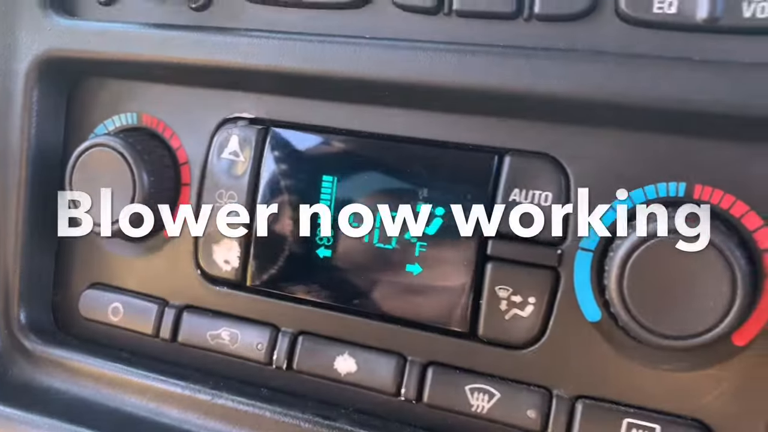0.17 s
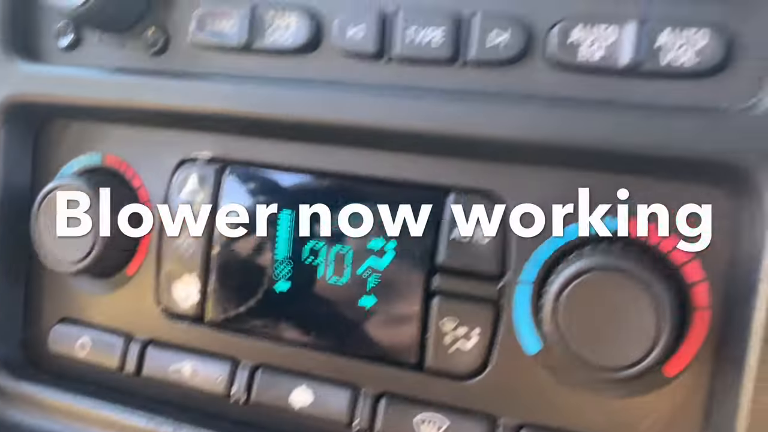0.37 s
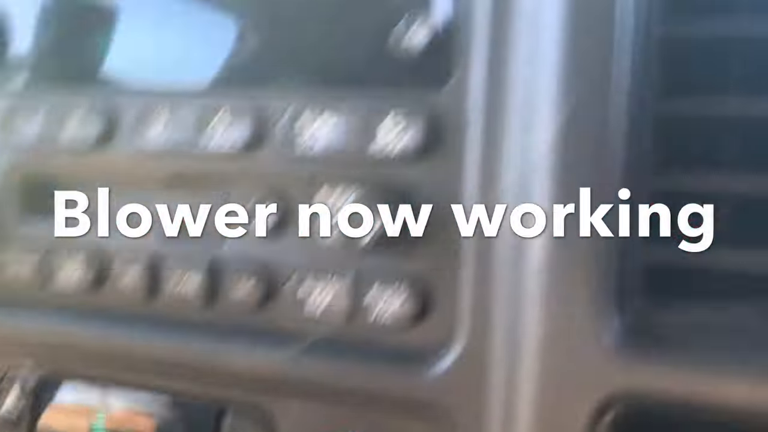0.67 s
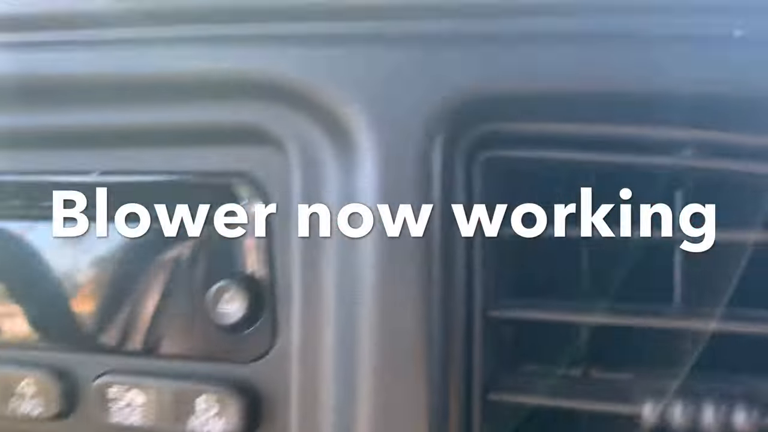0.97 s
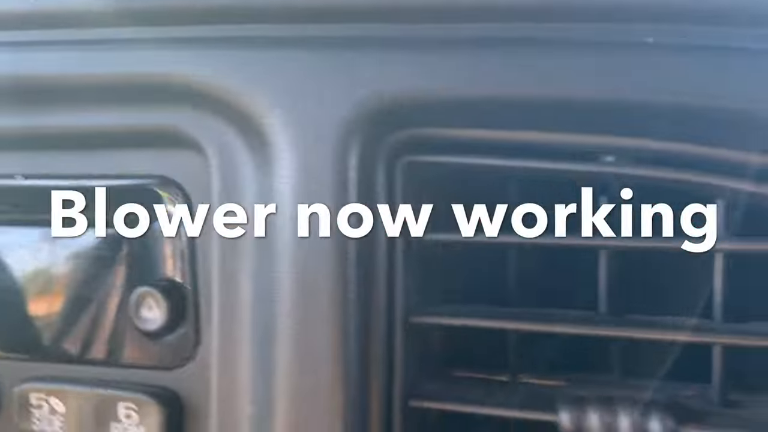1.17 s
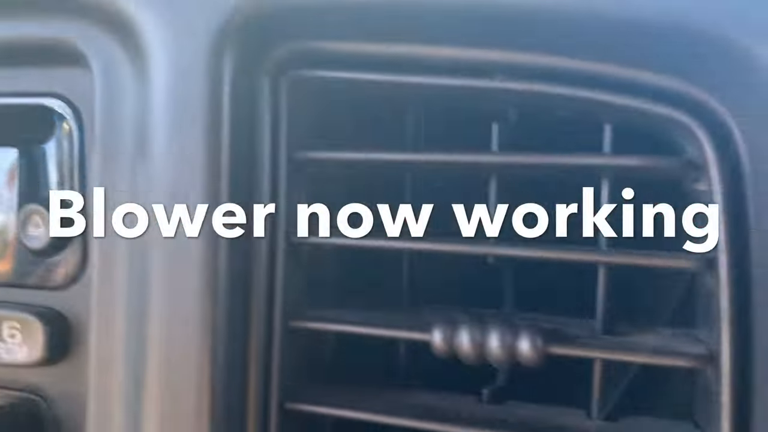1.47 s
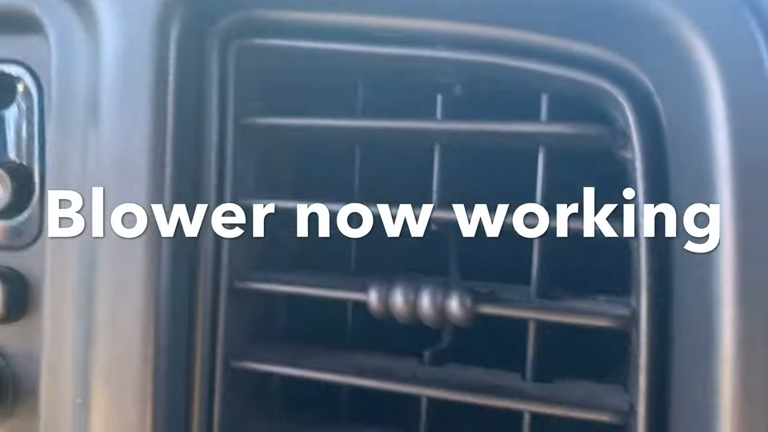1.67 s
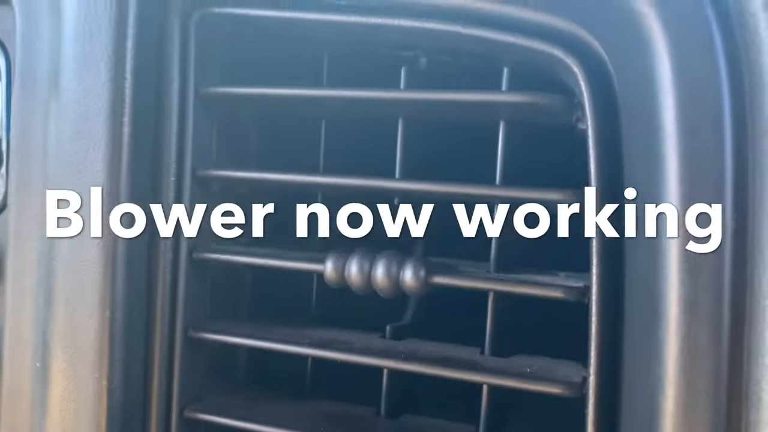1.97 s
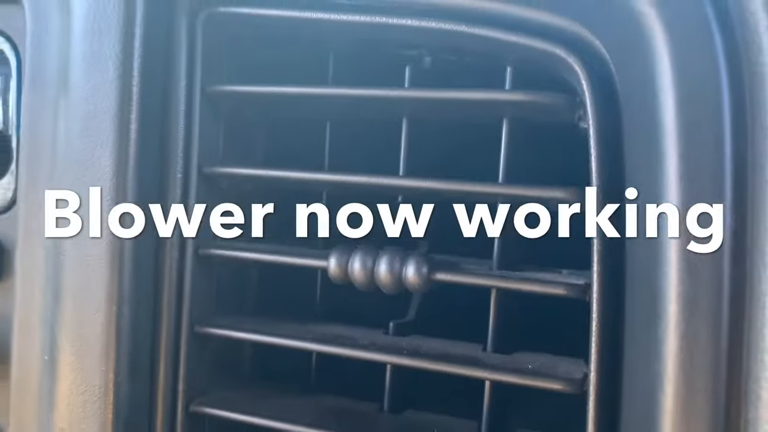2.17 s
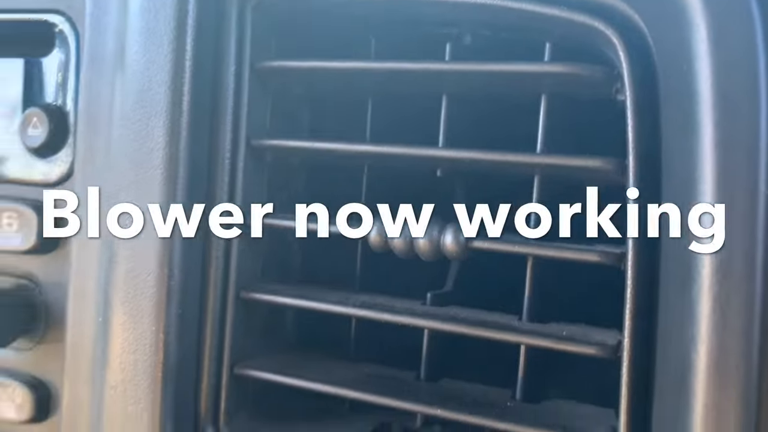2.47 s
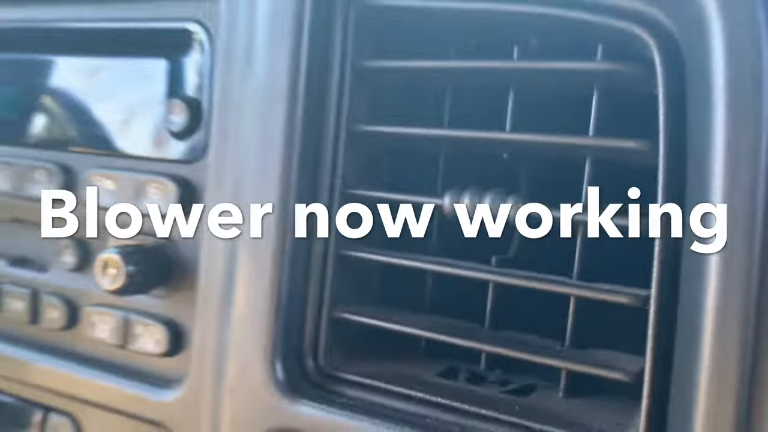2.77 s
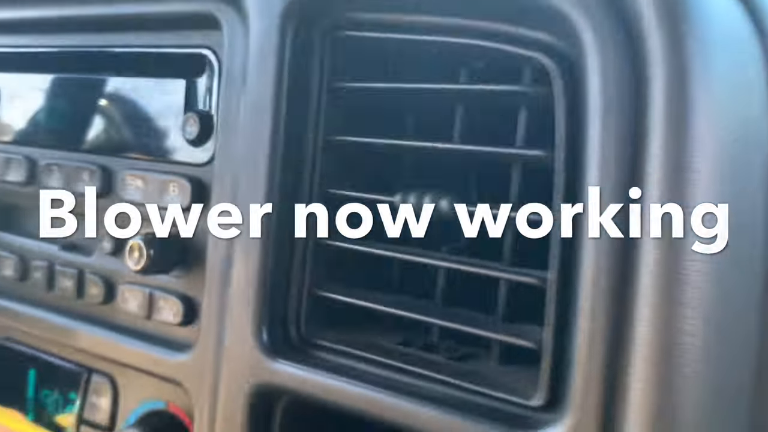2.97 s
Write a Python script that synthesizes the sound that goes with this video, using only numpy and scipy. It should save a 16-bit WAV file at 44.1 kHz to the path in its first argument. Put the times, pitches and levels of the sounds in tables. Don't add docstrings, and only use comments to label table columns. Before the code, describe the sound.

Blower air rushes from a dashboard vent throughout, with deep cabin boom, hollow duct roar and fine hiss that rises until about 0.8 s as the handheld microphone nears. At 0.35-0.54 s bumpy wind thumps hit the microphone, with a tiny squeak. Light plastic ticks follow, densest until 0.9 s, with a soft hand rustle at 0.83 s. Airflow continues steadily, fluttering slightly, easing faintly near 3 s without stopping.

```python
import sys
import numpy as np
from scipy import signal
from scipy.io import wavfile
from scipy.ndimage import uniform_filter1d

SR = 44100
rng = np.random.default_rng(int(sys.argv[2]) if len(sys.argv) > 2 else 0)


def volts(x):
    e = np.asarray(x, float) / 20
    return 10 ** e


def materialize(psi):
    bounded = np.clip(np.atleast_2d(psi).T, -1, 1)
    quanta = np.round(bounded * 32767).astype(np.int16)
    wavfile.write(sys.argv[1], SR, quanta)


N = 137151
TIME = np.arange(N) / SR


def evened(x):
    return x / np.sqrt(np.mean(x ** 2) + 1e-20)


def read(points, hz):
    f, value = np.transpose(points)
    return np.interp(np.log(hz + 1), np.log(f + 1), value)


def along(points, t):
    s, value = np.transpose(points)
    return np.interp(t, s, value)


def add(mix, s, sound):
    part = mix[:, round(s * SR):][:, :sound.shape[1]]
    part += sound[:, :part.shape[1]]


# f/Hz, likeness (clipped to 0..1)
PORT_LIKENESS = [(400, -0.04), (700, 1.16), (1100, 0.34), (1600, 0.42), (2500, 1.02), (5000, -0.3),
                 (6800, 0.36), (8500, 1.1), (15000, 3.6)]
# f/Hz, lead/rad
PORT_LEAD = [(200, 0), (1100, 1.41), (2800, 1.5), (4500, 7.5), (6800, 6), (8500, 9.5)]
# f/Hz, level/dB
PORT_TILT = [(500, -0.5), (1100, 1), (1800, 0), (4500, -2), (7000, -2.5), (8500, 0.5)]


def air(colour, bumps=(), same=None, patch_db=1.5, swell_db=.6, flicker_db=.5, size=1024):
    delay_s, ripple_db = 0.0002, 2.5
    hop = size // 4
    frames, hz = N // hop + 5, np.fft.rfftfreq(size, 1 / SR)
    a, b, c, d, patches = rng.standard_normal((frames, len(hz), 5)).T
    patches = uniform_filter1d(patches, size=7, axis=0)
    patches = evened(uniform_filter1d(patches, size=10, axis=1))
    swell = evened(uniform_filter1d(rng.standard_normal(frames), size=SR // 8 // hop))
    level_db = swell_db * swell + flicker_db * rng.standard_normal(frames)

    shape_db = read(colour, hz)
    for f, width, db in bumps:
        shape_db = shape_db + db / (1 + (2 * (hz - f) / width) ** 2)
    outside = (hz < colour[0][0]) | (hz > colour[-1][0])
    shape_db = shape_db - 80 * outside
    ripple = volts(ripple_db * rng.standard_normal((len(hz), 2)).T)[:, :, None]
    ripple = (ripple[0] * ripple) ** .5

    like = read(PORT_LIKENESS, hz) if same is None else same + 0 * hz
    like = np.clip(like, 0, 1)[:, None]
    lead = read(PORT_LEAD, hz) + 2 * np.pi * delay_s * np.maximum(hz - PORT_LEAD[-1][0], 0)
    tilt = volts(read(PORT_TILT, hz) / 2)[:, None]
    left = a + 1j * b
    right = like * left * np.exp(1j * lead)[:, None] + np.sqrt(1 - like ** 2) * (c + 1j * d)
    level = volts(shape_db[:, None] + patch_db * patches + level_db)
    z = np.array([left * tilt, right / tilt]) * ripple * level
    return evened(signal.istft(z, nperseg=size, noverlap=size - hop)[1][:, :N])


# f/Hz, level/dB per Hz
BOOM_COLOUR = [(11, -60), (18, 1), (44, -0.5), (124, -1), (166, -6), (259, -16.5), (346, -17), (368, -20.5),
               (700, -31.5), (910, -39.5), (1540, -120)]
# f/Hz, width/Hz, level/dB
CABIN_MODES = [(64.6, 8.3, 7.04), (105.1, 47, 9.4), (138, 15, 3.2), (229, 12, 1.1), (334.4, 29, 6.7)]
# t/s, level/dB
CAMERA_PLACE = [(0, 1.5), (.17, 0.5), (.3, 2), (.6, -0.5), (.8, 0.5), (.9, 0.5), (1.08, 1), (1.2, -2),
                (1.5, -1.5), (1.7, 0.5), (1.9, 0.5), (2.08, 1), (2.25, -2), (2.5, 1.5), (2.68, -1),
                (2.8, -2), (3.0, -1.5), (3.11, -2)]


def cabin_boom():
    boom = air(BOOM_COLOUR, CABIN_MODES, .9, patch_db=0.84, swell_db=0.53, flicker_db=0.4, size=2048)
    return boom * volts(-22 + along(CAMERA_PLACE, TIME))


# f/Hz, level/dB per Hz
ROAR_COLOUR = [(300, -1), (550, -2.5), (900, -8), (1700, -8), (2350, -11), (2550, -15.5), (5500, -23),
               (8000, -26)]
# f/Hz, width/Hz, level/dB
DUCT_MODES = [(658, 81, -4), (790, 74, 5), (1008, 240, 5.5), (1337, 88, 3.5), (1514, 166, 8),
              (2024, 214, 6), (3650, 1400, 1.5)]
# t/s, level/dB
NEARNESS = [
    (0, -6.5),
    (.3, -4),
    (.55, -1),
    (.8, 0),
    (1.1, -0.2),
    (1.5, 0.5),
    (2.0, 0.5),
    (2.5, 0.5),
    (2.85, 0),
    (3.11, -1.5),
]


def duct_roar():
    roar = air(ROAR_COLOUR, DUCT_MODES, patch_db=1.43, swell_db=-0.26, flicker_db=0.03)
    return roar * volts(-40.5 + 0.61 * along(NEARNESS, TIME))


# f/Hz, level/dB per Hz
HISS_COLOUR = [(4000, -72), (6000, -7.5), (7800, -6), (8500, 2.5), (10000, -1), (11500, -3.5), (13500, -4),
               (16000, -6.5)]


def louvre_hiss():
    hiss = air(HISS_COLOUR, patch_db=2.5, swell_db=-1.0, flicker_db=0.7)
    return hiss * volts(-53 + along(NEARNESS, TIME))


# f/Hz, level/dB per Hz
JET_COLOUR = [(150, -16), (260, -5), (400, 7), (600, -7.5), (900, -9), (1300, -19.5)]
# t/s, level/dB
JET_FLOW = [(0, -46), (.3, -40.5), (.6, -60), (1.05, -46.5), (1.3, -41.5), (1.85, -44), (2.05, -48.5),
            (2.17, -37), (2.4, -35.5), (2.6, -41.5), (2.8, -37.5), (3.11, -43)]


def passing_jet():
    return volts(along(JET_FLOW, TIME)) * air(JET_COLOUR, patch_db=1.0, flicker_db=3.5, size=512)


# t/s, peak level/dB, f/Hz, length/cycles
JET_EDDIES = [(0.346, -14.5, 398, 1.5), (0.350, -1.5, 128, 0.6), (0.384, -23, 513, 1.4),
              (.387, -5, 175, 0.76), (.403, -13, 387, 1.9), (0.431, -6.5, 204, 1.73),
              (0.434, -7.5, 556, 1.45), (.435, -33, 960, 3.4), (0.444, -19, 141, 1.4),
              (0.457, -11, 266, 1.1), (.462, -25, 1370, 2.7), (.466, -10.5, 443, 1.47),
              (.467, -22, 820, 2.6), (.468, -28, 1320, 2.3), (0.472, -9, 112, 1.06),
              (0.485, -6.5, 288, 0.85), (.485, -22, 600, 2), (.484, -25, 1050, 2.5), (.489, -30, 1550, 3.3),
              (.497, -6, 395, 3.2), (.490, -11, 68, 1.8), (.495, -24, 780, 1.5), (.500, -11.5, 230, 2.7),
              (.499, -21, 970, 2.5), (.503, -22, 584, 4.1), (0.509, -8.5, 124, 0.6), (0.52, -7, 73.4, 1.4),
              (.527, -12, 333, 0.89), (.514, -25, 1000, 1.4), (.522, -15, 626, 4.9), (.523, -25.5, 1170, 5),
              (.523, -29, 1550, 3.7), (.523, -4.5, 318, 0.93), (.530, -6.5, 121, 0.54),
              (0.761, -21.5, 303, 0.43), (1.039, -21.5, 328, 1.2), (1.845, -22, 192, 2.1)]


def eddies():
    reach, edge_hz, right_apart = 900, 650, .4
    out, u = np.zeros((2, N)), np.arange(-reach, reach) / SR
    turns = rng.uniform(0, 2 * np.pi, (len(JET_EDDIES), 2))
    for (s, db, hz, cycles), turn in zip(JET_EDDIES, turns):
        bell = np.exp(-(2 * u * hz / cycles) ** 2)
        push_or_pull = np.pi * (turn[0] > np.pi)
        shared = np.cos(2 * np.pi * hz * u + push_or_pull + .1 * turn[1])
        apart = np.cos(2 * np.pi * hz * u + turn[1])
        rag = signal.lfilter(*signal.butter(4, edge_hz, fs=SR), rng.standard_normal(len(u)))
        left = shared + volts(-22 + 9 * np.log2(hz / 250)) * evened(rag)
        add(out, s - reach / SR, volts(db) * bell * np.array([left, left + right_apart * apart]))
    return out


# t/s, level/dB
GUST_LEVEL = [
    (.28, -70),
    (.34, -31),
    (.42, -29),
    (.46, -21),
    (.527, -18),
    (.543, -70),
]
# f/Hz, level/dB per Hz
GUST_TONE = [(25, -4), (60, 0), (130, -2), (300, -7), (600, -14), (1200, -30), (2000, -46)]


def gust():
    return volts(along(GUST_LEVEL, TIME)) * air(GUST_TONE, (), .9, patch_db=2, flicker_db=2, size=512)


def buffet():
    left, right = eddies() + gust()
    dull = signal.butter(2, 600, fs=SR)
    return np.array([left, signal.filtfilt(*dull, right) + volts(-19) * left])


# t/s, peak level/dB
GRIP_TICKS = [(0.5387, -32), (0.5712, -30), (0.5890, -30), (0.6123, -31), (0.6300, -37), (0.6470, -31),
              (0.7147, -32), (0.7735, -30.5), (0.813, -27.5), (0.8382, -36), (0.8497, -24.5), (0.883, -36),
              (0.89, -29.5), (1.0308, -35), (1.2708, -34.5), (1.3963, -37), (1.422, -36), (1.5465, -26),
              (1.7625, -31), (2.191, -48)]
# f/Hz, level/dB, T60/s
CASE_MODES = [(900, -8, .015), (1460, -5, .025), (2300, -10, .01), (3300, -18, .008)]


def grip_ticks():
    snap_db, snap_hz = 4, 1700
    out, t = np.zeros((2, N)), np.arange(1500) / SR
    snap = volts(snap_db) * np.sin(2 * np.pi * snap_hz * t) * np.exp(-(2 * (snap_hz * t - 1)) ** 2)
    onset = np.minimum(snap_hz * t, 1)
    vary = rng.standard_normal((len(GRIP_TICKS), 2, len(CASE_MODES)))
    for (s, db), r in zip(GRIP_TICKS, vary):
        tick = snap * [[1], [.6]]
        for k, (f, mode_db, t60) in enumerate(CASE_MODES):
            ring = np.sin(2 * np.pi * f * (1 + 0.058 * r[0, k]) * t)
            tick = tick + volts(mode_db + 2 * r[:, k, None] - 60 * t / t60) * onset * ring
        add(out, s, volts(db) * tick)
    return out


def grip_squeak():
    start_s, base_hz, level_db, t60 = .405, 5300, -39, .045
    out, t = np.zeros((2, N)), np.arange(1500) / SR
    slip = np.cumsum(1 + 0.2 * rng.standard_normal(len(t))) / SR
    squeak = 0
    for ratio, gain in [(1, 1.0), (.87, 0.8), (1.9, 0.4), (0.9, 0.29)]:
        squeak = squeak + gain * np.sin(2 * np.pi * ratio * base_hz * slip)
    fade = volts(level_db - 60 * t / t60) * np.minimum(t / 0.0033, 1)
    add(out, start_s, fade * squeak * [[1], [.2]])
    return out


# f/Hz, level/dB per Hz
RUSTLE_COLOUR = [(600, -5), (1100, 1), (1800, -1), (3000, -3), (5500, -5), (8500, -13), (11000, -30)]


def hand_rustle():
    start_s, level_db, hold_s, t60, centre = .828, -47.5, .04, .4, .6
    u = TIME - start_s
    brush = np.clip(u / 0.0047, 0, 1) * volts(level_db - 60 * np.maximum(u - hold_s, 0) / t60)
    rub = air(RUSTLE_COLOUR, (), 0.13, patch_db=2.5, flicker_db=2.0, size=256)
    return brush * (rub + centre * rub[::-1])


def scene():
    fan = cabin_boom() + duct_roar() + louvre_hiss() + passing_jet()
    grip = grip_ticks() + grip_squeak() + hand_rustle()
    return fan + buffet() + grip


def band_limit(x):
    return signal.sosfilt(signal.butter(12, 17080, fs=SR, output="sos"), x)


# t/s, f/Hz
MONO_EDGE = [
    (.83, 5),
    (.9, 270),
    (1.0, 470),
    (1.12, 615),
    (3.11, 620),
]


def record(dry):
    ceiling, low_cut_hz, top_hz = .95, 36, 15760
    steep, lip_db = 7.7, 6
    slip_s, slip_len_s, slip_hz, slip_db = 1.78, .1, 80, -17
    low_cut = signal.butter(4, low_cut_hz, "high", fs=SR, output="sos")
    wide = signal.sosfilt(low_cut, ceiling * np.tanh(dry / ceiling))
    top_cut = signal.firwin(801, top_hz, window=("kaiser", 9), fs=SR)
    wide = signal.oaconvolve(wide, top_cut[None], "same")
    mid, side = (wide[0] + wide[1]) / 2, (wide[0] - wide[1]) / 2

    hz, t, z = signal.stft(side, SR, nperseg=1024, noverlap=896)
    hz = hz[:, None]
    under = along(MONO_EDGE, t) / (hz + 1)
    lip = volts(lip_db * np.exp(-(np.log(under) * 5) ** 2))
    keep = lip / (1 + under ** (2 * steep)) ** .5
    slipping = (t > slip_s) & (t < slip_s + slip_len_s)
    keep = keep + volts(slip_db) * slipping / (1 + (hz / slip_hz) ** 6)
    side = signal.istft(z * keep, SR, nperseg=1024, noverlap=896)[1][:N]
    return band_limit(np.array([mid + side, mid - side]))


dry = scene()
out = record(dry)
materialize(out)
```